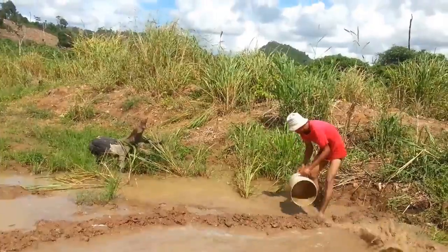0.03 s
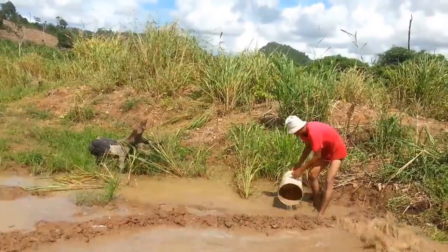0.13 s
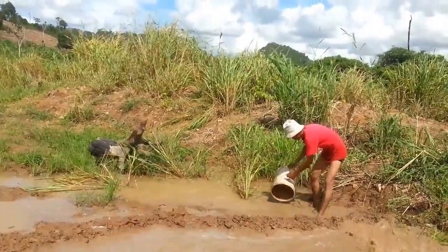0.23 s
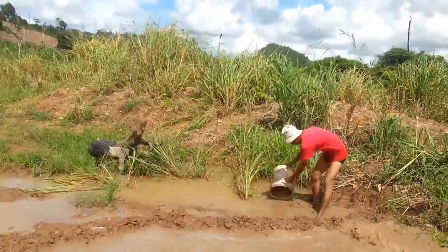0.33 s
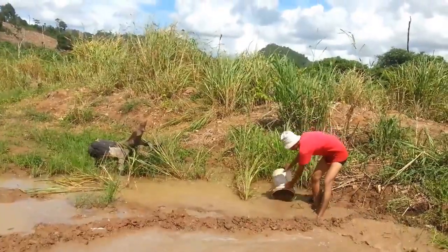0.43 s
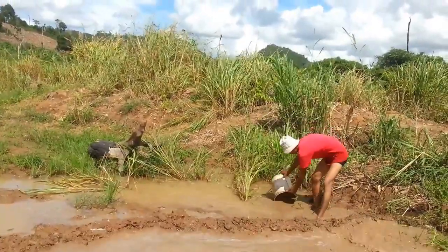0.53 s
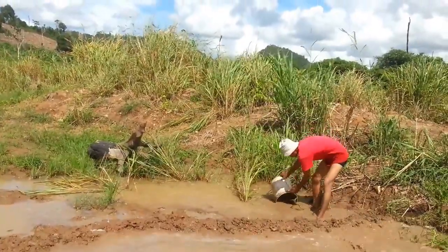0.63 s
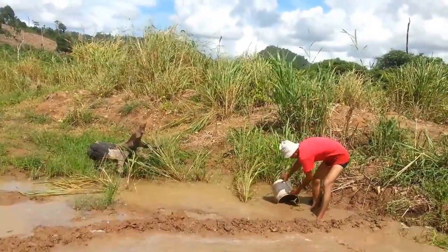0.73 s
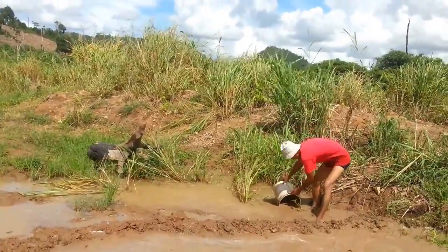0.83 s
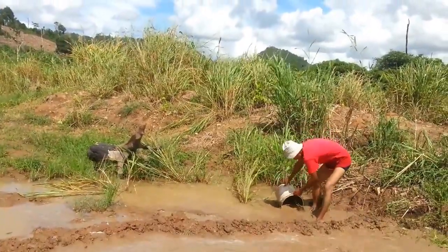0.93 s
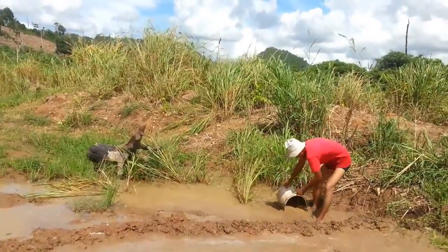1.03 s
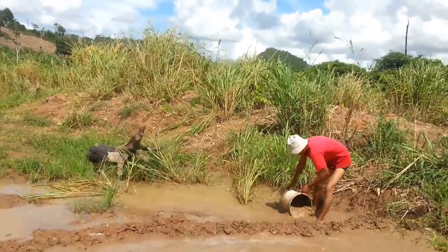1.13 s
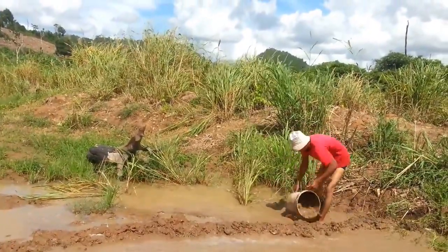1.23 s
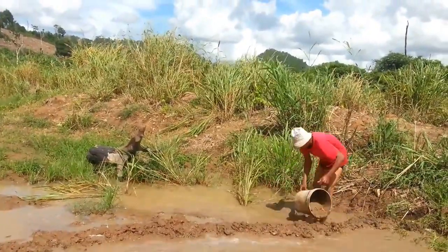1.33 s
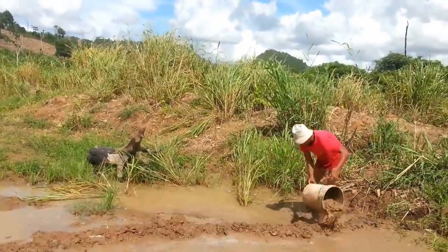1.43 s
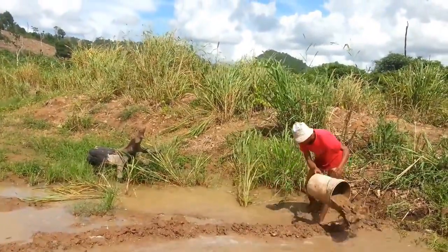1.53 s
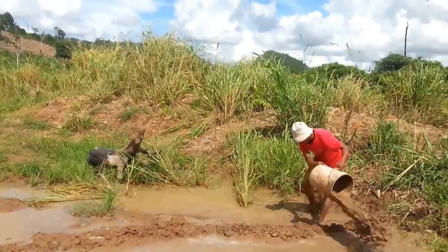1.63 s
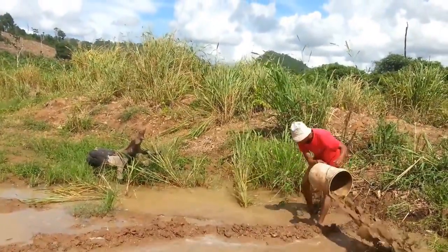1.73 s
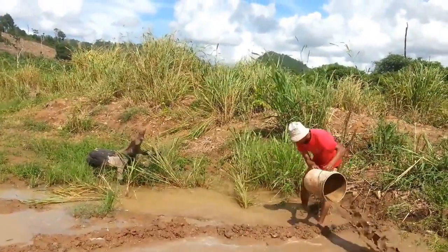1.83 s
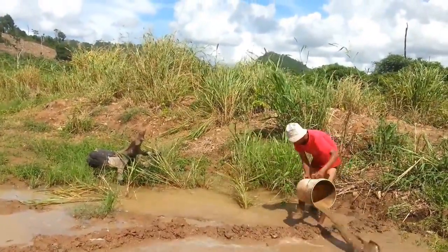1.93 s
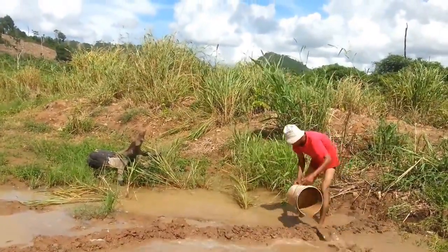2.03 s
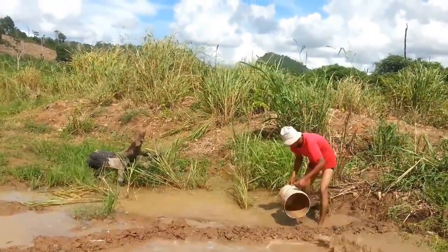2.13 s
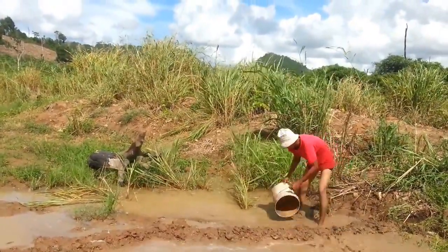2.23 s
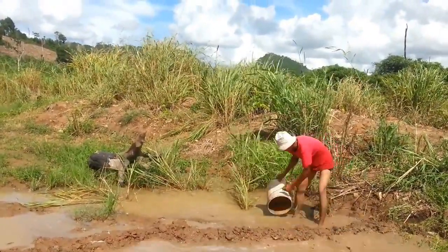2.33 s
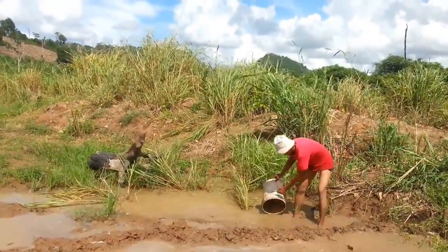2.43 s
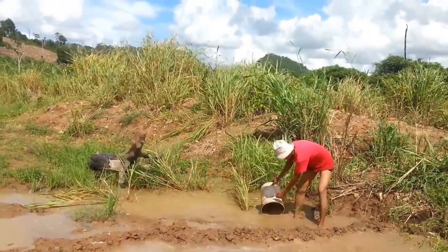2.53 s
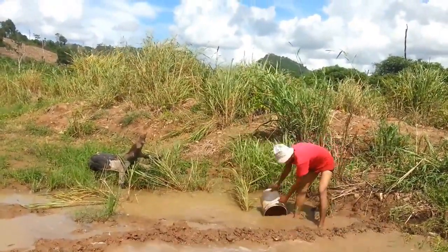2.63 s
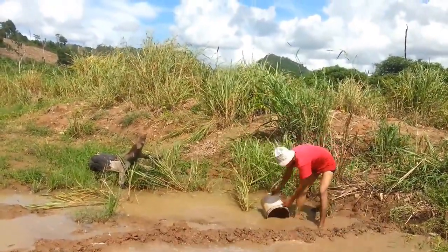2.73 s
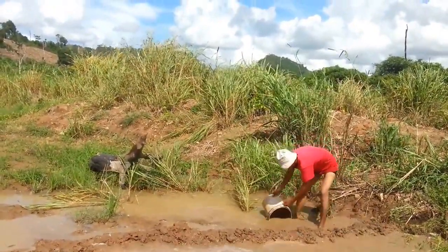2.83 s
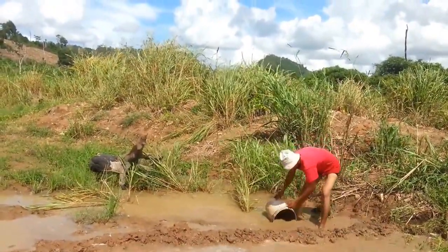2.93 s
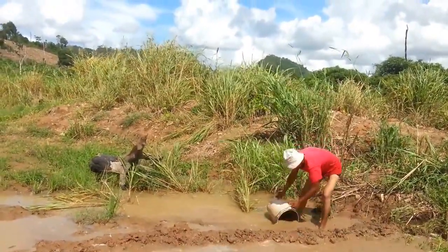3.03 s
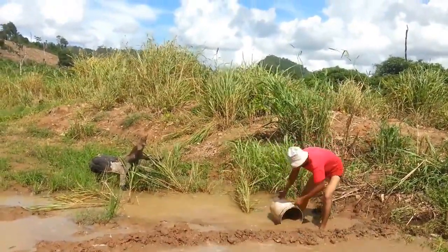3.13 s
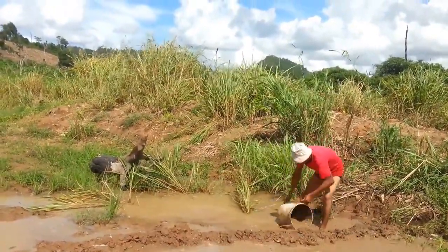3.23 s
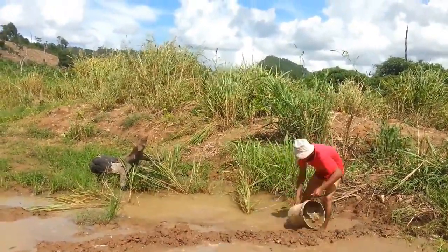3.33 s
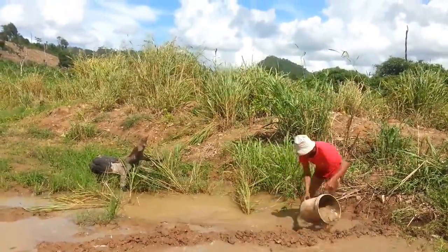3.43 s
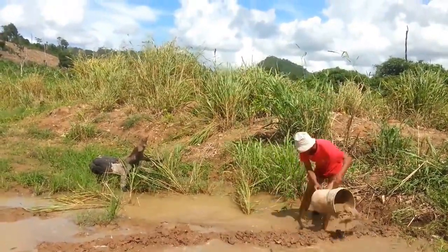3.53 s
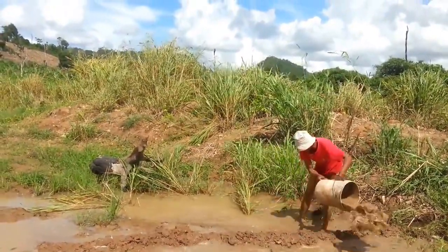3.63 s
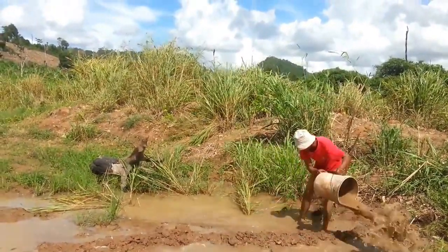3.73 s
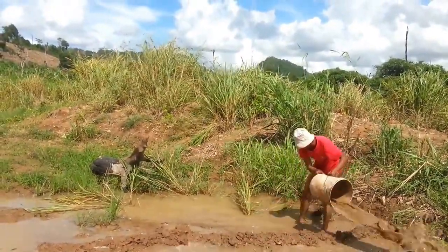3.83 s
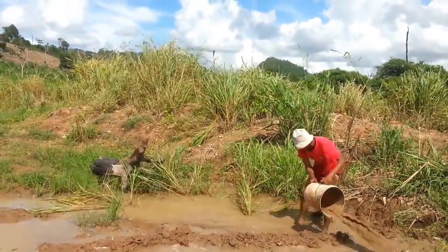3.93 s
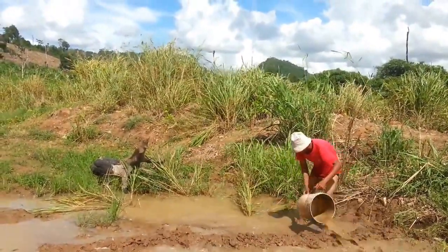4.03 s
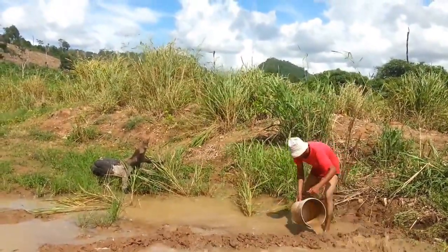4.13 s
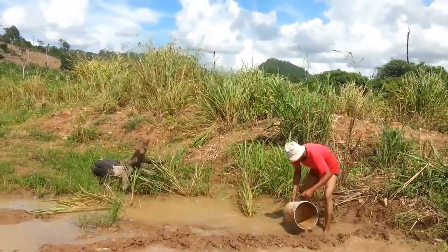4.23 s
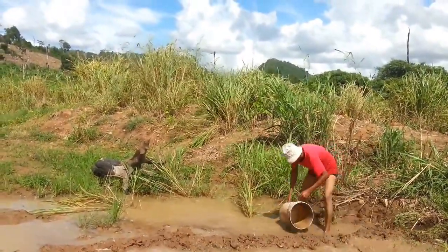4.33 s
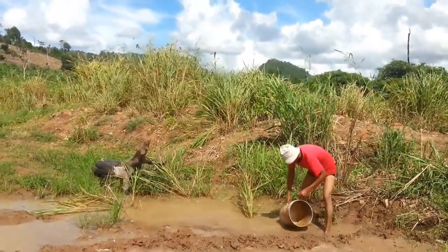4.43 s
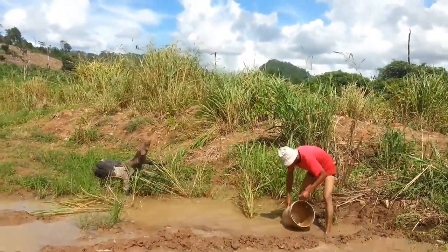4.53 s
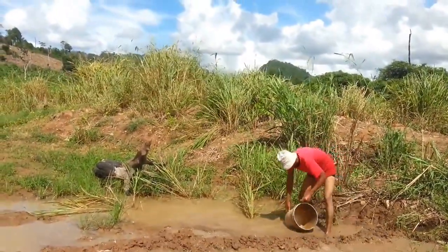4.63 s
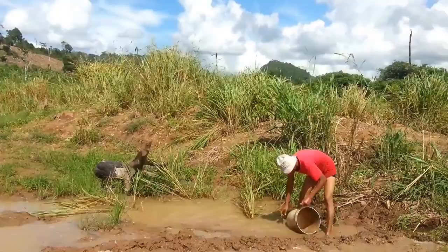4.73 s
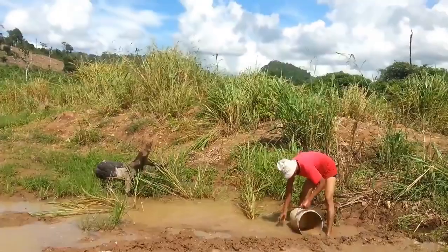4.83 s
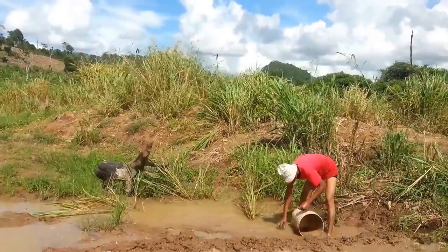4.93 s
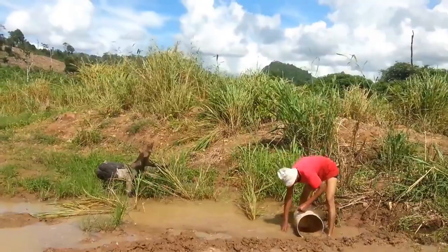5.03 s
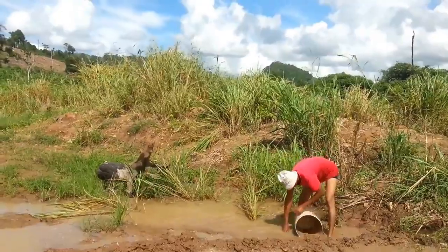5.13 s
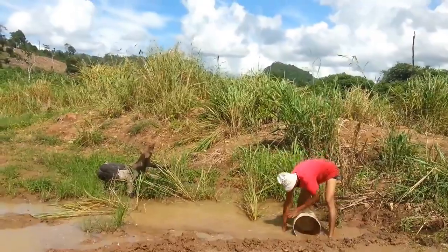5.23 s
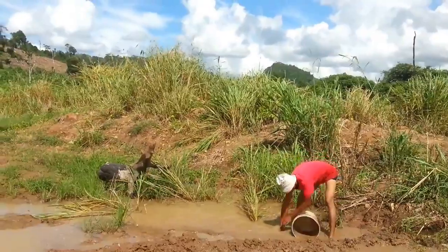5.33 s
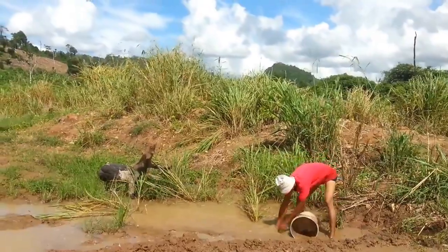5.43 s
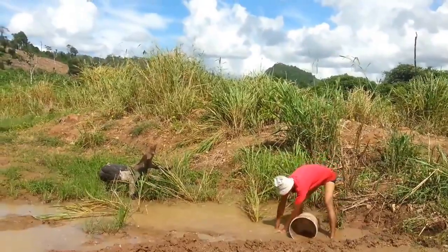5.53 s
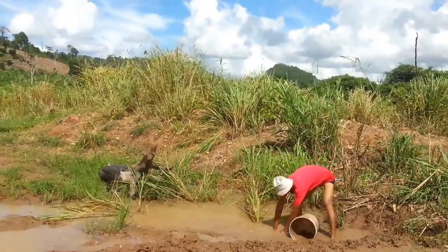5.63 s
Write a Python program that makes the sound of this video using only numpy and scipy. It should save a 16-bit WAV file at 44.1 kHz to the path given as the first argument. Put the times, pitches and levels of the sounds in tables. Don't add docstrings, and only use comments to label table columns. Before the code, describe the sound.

A muddy ditch is bailed by bucket in an open field, heard in stereo with a dry, mid-heavy sound. At 0.1 s a load of water slaps down hard, bubbles bursting and spray ticking, and runs off by about 0.5 s. From 0.6 to 1.8 s the bucket dips and lifts with soft sloshes, low glugs, fine spritzes and drips, while a small bird gives seven thin falling chirps around 0.75-1.1 s, slightly right. The second load lands at 1.9-2.3 s, a broad splash with lumpy plops. Quieter scooping follows, with a wet slap at 2.9 s and a gurgling lift at 3.3-3.7 s. The third load hits at 4.05-4.3 s, the deepest, with a loud hollow gulp near 4.16 s. Then sparse drips and trickling continue, with a faint, very high insect rasp on the left at 5.1-5.3 s. A barely audible low rumble and far engine drone lie underneath.

```python
import sys
import numpy as np
from scipy import signal
from scipy.fft import rfft, irfft, next_fast_len
from scipy.io import wavfile
from scipy.ndimage import uniform_filter1d, map_coordinates

SR = 44100
rng = np.random.default_rng(int(sys.argv[2]) if len(sys.argv) > 2 else 0)


def boost_factor(decibels):
    exponent = np.asarray(decibels, float) / 20
    return 10 ** exponent


def generate_wav(sig):
    pcm = np.round(np.clip(np.atleast_2d(sig).T, -1, 1) * 32767).astype(np.int16)
    wavfile.write(sys.argv[1], SR, pcm)


N = 250488


def water():
    slosh_db, spray_db, mist_db, heave_db = motion()
    deep_db = slosh_db + 0.2294 * (slosh_db + 25.5)
    surge = wobble(30)
    slosh = froth(790.0, 2175, 2.88, cycles=1.31, scatter_db=1.24, wash_db=9.5, count=5000, size=260)
    deep = froth(419.3, 800.5, 2.1, cycles=1.77, scatter_db=0.57, wash_db=10.5, count=1800, size=600)
    spray = froth(2130.6, 7302, 4.24, cycles=2.46, scatter_db=3.5, wash_db=7.5, count=9000, size=140)
    mist = froth(6480, 13540, 4.09, cycles=0.9, scatter_db=3.5, wash_db=5.5, count=12000, size=44)
    heave = froth(139.5, 304.2, 2.87, cycles=0.418, scatter_db=1.5, wash_db=17, count=500, size=500)
    return (boost_factor(slosh_db - 2.43 + 0.655 * surge + 0.55 * wobble(42)) * slosh
            + boost_factor(deep_db - 5.0 + 0.4 * surge + 0.263 * wobble(24.94)) * deep
            + boost_factor(spray_db + 1.4035 + 0.5 * surge + 1.52 * wobble(70)) * spray
            + boost_factor(mist_db + 2.5 + 0.94 * surge + 0.35 * wobble(60)) * mist
            + boost_factor(heave_db - 3.0 + 0.97 * surge + 1.44 * wobble(13.0)) * heave)


# (peak time [s], level [dB], rise [s per 20 dB], fall [s per 20 dB], spray share [dB])
THROWS = [(0.0, -28, .1, .5, -7.5), (0.113, -21, 0.074, 0.1846, -4.5), (0.2, -27.5, 0.073, 0.192, -24),
          (0.35, -31, 0.245, 0.2824, -11.5), (0.46, -40, 1, 1.07, -2.5), (1.86, -46.5, 0.068, 0.19, 8.5),
          (1.94, -20.5, 0.049, 0.297, -4), (2.01, -19.5, 0.089, 0.1911, -9.5),
          (2.188, -25.5, 0.183, 0.3333, -5.5), (2.36, -37.5, 0.42, 0.2666, -6.5),
          (2.5, -40.5, 0.51, 0.93, -3.5), (4.026, -42, 0.076, 0.7716, 5.5),
          (4.061, -22.5, 0.0402, 0.36, -2.5), (4.156, -21, 0.1205, 0.1758, -8),
          (4.23, -29, 0.033, 0.2581, -9.5), (4.37, -31, 0.32, 0.1328, -10.5), (4.47, -39, 0.29, 0.19, -1.5)]
# (peak time [s], level [dB], rise [s per 20 dB], fall [s per 20 dB], spray share [dB])
STIRS = [(0.62, -40, 0.128, 0.3652, -6.5), (0.81, -47, 0.37, 4, -6.5), (1.2, -44, 0.4, 0.17, -12),
         (1.27, -50.5, 0.076, 0.41, 7), (1.44, -38.5, 0.287, 0.25, -8), (1.51, -39.5, 0.252, 0.1737, 0.5),
         (1.63, -43.5, 0.16, 0.39, -8.5), (1.79, -45, 0.26, -4.72, -7.5), (2.7, -37.5, 0.326, 0.16, -10),
         (2.94, -38.5, 0.121, 0.1239, -5.5), (3.12, -52.5, 0.5, 2.1, -6.5), (3.36, -46, 0.103, 0.5, 4.5),
         (3.47, -36.5, 0.194, 0.2163, -6), (3.622, -30.5, 0.1164, 0.1232, -4.5),
         (3.8, -43.5, 0.196, 0.14, -5.5), (4.7, -46, 0.3, 3.5, -4), (5.5, -46, 1, -0.5, -11),
         (5.68, -53, 0.27, 1.5, -2)]
# (peak time [s], level [dB], rise [s per 20 dB], fall [s per 20 dB])
HEAVES = [(0.11, -37, 0.13, 0.163), (0.351, -38.5, 0.098, 0.0575), (0.618, -51, 0.127, 0.67),
          (1.09, -53.5, 0.72, 7), (3.2, -58, 0.66, 2), (1.255, -41, 0.039, 0.2), (1.51, -44.5, 0.15, 0.21),
          (1.63, -45.5, 0.056, 0.12), (1.79, -53.5, 0.103, -1), (2.02, -33.5, 0.093, 0.0452),
          (2.22, -46, 0.42, 0.01), (2.72, -47.5, 0.055, 0.25), (2.88, -40, 0.077, -0.02),
          (3.619, -41, 0.104, 0.0925), (4.061, -42.5, 0.016, 0.58), (4.16, -18.5, 0.019, -0.0187),
          (4.27, -48.5, .1, 0.18), (4.9, -57.5, 1, 2)]
# (slosh [dB], spray [dB], mist [dB], heave [dB])
CALM_DB = (-53.5, -58.5, -55, -69.5)
# (thrown [dB], stirred [dB])
MIST_DB = (-6, -11)


def motion():
    mist_grows = 0.043
    t = np.arange(0, N / SR + 0.01, 0.002)
    power = np.zeros((4, len(t))) + boost_factor(CALM_DB)[:, None] ** 2
    for table, under_db in zip((THROWS, STIRS), MIST_DB):
        s, db, rise, fall, share_db = np.transpose(table)
        spray_db = db + share_db
        mist_db = spray_db + under_db + mist_grows * (db + 41.5)
        power[0] += surges(t, s, db, rise, fall)
        power[1] += surges(t, s, spray_db, rise, fall)
        power[2] += surges(t, s, mist_db, rise, 0.69 * fall)
    power[3] += surges(t, *np.transpose(HEAVES))
    return [np.interp(np.arange(N) / SR, t, 10 * np.log10(p)) for p in power]


def surges(t, s, db, rise, fall):
    late = t - s[:, None]
    away = np.abs(late / np.where(late < 0, rise[:, None], fall[:, None]))
    return (boost_factor(db[:, None] - 20 * away ** 1.082) ** 2).sum(axis=0)


# (frequency [Hz], coherence [0-1])
ALIKE = [(60, 1), (150, 0.33), (600, 0.98), (1800, 0.61), (4800, 0.77), (5400, 0), (15000, 0)]


def froth(lo_hz, hi_hz, edge, cycles, scatter_db, wash_db, count, size):
    swarms = []
    for _ in range(2):
        when, pitch, big = rng.random((3, count))
        hz = lo_hz * (hi_hz / lo_hz) ** pitch
        strength = hz * boost_factor(-scatter_db * np.log(big + 0.02))
        swarm = rings(when * N / SR, strength, hz, cycles / hz, 0.03245, 1.0, size)
        swarms.append(unit(swarm) + boost_factor(wash_db) * wash(patchy_db=1.1))

    def heard(f):
        band = 1 / (1 + (lo_hz / (f + 1)) ** edge) / (1 + (f / hi_hz) ** edge)
        turn = np.arccos(np.clip(along(ALIKE, f), 0, 1)) / 2
        shared, opposed = np.cos(turn), np.sin(turn)
        return band * ports(f)[:, None] * np.array([[shared, opposed], [shared, -opposed]])
    return unit(filtered(np.array(swarms), heard).sum(axis=1))


def wash(patchy_db):
    z = signal.stft(rng.standard_normal(N), nperseg=512)[2]
    patches = uniform_filter1d(rng.standard_normal(z.shape), size=5, axis=0)
    patches = uniform_filter1d(patches, size=6, axis=1)
    return signal.istft(z * boost_factor(patchy_db * patches / patches.std()), nperseg=512)[1][:N]


# (time [s],
# peak level [dB], pitch [Hz], swell [ms])
POCKETS = [(0.106, -3, 1270, 1.16), (0.115, -6, 1168, 2.65), (0.141, -15.5, 1255, 3.4),
           (0.212, -9.5, 857, 5.1), (1.256, -32.5, 1314, 6.7), (1.438, -16, 1554, 2.96),
           (1.514, -17.5, 1044, 2.26), (1.696, -31, 928, 8), (1.929, -8, 1832, 3.76),
           (1.963, -3, 1672, 2.6), (2.019, -17.5, 1322, 3.8), (2.043, -11.5, 1104, 11.4),
           (2.107, -11.5, 617.6, 7.2), (2.144, -14, 1048, 13.6), (2.179, -10, 639, 2.7),
           (2.204, -17.5, 631, 4.2), (2.94, -16, 1082, 4), (3.394, -26, 697, 8.2), (3.408, -17, 1163, 2.7),
           (4.056, -15, 1182, 9.4), (4.069, -11.5, 1673, 4.8), (4.084, 2, 813, 0.78),
           (4.111, -2.5, 615, 3.6), (4.134, -0.5, 710, 2.2), (4.147, 0, 573.3, 3.85), (4.171, -1, 625, 2.3),
           (4.204, -10.5, 558, 5.4), (4.244, -16, 1637, 7.9), (5.491, -30.5, 1121, 11.6),
           (4.158, -3.5, 343.4, 5.37),
    (4.1575, 9.5, 572.9, 4.77),
    (4.6, -36, 650, 4.8),
    (3.309, -34, 555, 5.8),
]


def crushed_air():
    return plops(np.array(POCKETS), -9.5, 0.00188, 3.08)


# (time [s], peak level [dB], pitch [Hz])
BUBBLES = [(0.087, -7, 1141), (0.29, -21, 678), (0.44, -24.5, 1124), (1.868, -22, 1257),
           (1.901, -13.5, 1746), (1.94, -7.5, 1724), (1.93, -26.5, 1905), (1.948, -1.5, 641),
           (2.525, -23, 1602), (2.605, -32.5, 1610), (2.632, -24, 1286), (2.913, -9.5, 1199),
           (4.021, -27, 1890), (4.024, -29.5, 1690), (4.049, -11, 1366), (4.126, -2, 809),
           (4.794, -33.5, 830), (5.441, -26, 1035)]
# (time [s], peak level [dB], pitch [Hz])
GURGLES = [(0.707, -25.5, 587), (0.74, -26.5, 1228), (0.79, -25, 985), (0.886, -29.5, 699),
           (1.129, -26, 535), (1.254, -22.5, 1237), (1.492, -26.5, 1738), (1.494, -32, 1102),
           (1.736, -31, 1950), (1.778, -26, 1292), (3.178, -33.5, 1147), (3.248, -29.5, 1527),
           (3.273, -34.5, 1046), (3.332, -25, 1652), (3.379, -15.5, 1776), (3.559, -29, 1792),
           (3.613, -26, 1612), (3.677, -21.5, 1802), (3.71, -27, 555.3), (3.824, -33.5, 1030),
           (4.632, -32, 1215), (4.932, -32.5, 823), (4.981, -33.5, 1193), (5.109, -28, 1139),
           (5.213, -32, 608), (5.406, -29, 1778), (5.613, -40, 1230)]


def large_bubbles():
    table = np.vstack([swelling(BUBBLES, 1.574), swelling(GURGLES, 2.7)])
    return plops(table, -5.0, 0.00507, 0.837)


# (time [s], peak level [dB], t60 [s])
SLAPS = [(0.088, -10.5, 0.04), (0.105, -2.5, 0.085), (0.223, -19.5, 0.077), (0.441, -45, 0.068),
         (0.707, -48, 0.1), (0.791, -22, 0.167), (1.255, -34, 0.0568), (1.484, -23, 0.077),
         (1.901, -18, 0.05), (1.939, -11.5, 0.133), (2.133, -13.5, 0.123), (2.1455, -2, 0.087),
         (2.865, -27, 0.295), (2.913, -7.5, 0.036), (2.922, -14.5, 0.077), (3.333, -17.5, 0.0336),
         (3.38, -20.5, 0.2), (4.126, -3, 0.086), (4.93, -23.5, 0.168), (5.441, -24.5, 0.084)]


def slaps():
    def dull(hz):
        return 1 / (1 + 1j * hz / 2600) ** 2 / (1 + 260 / (1j * hz + 1)) ** 2
    return bursts(SLAPS, 8.43, dull)


# (time [s], peak level [dB])
SPRITZ = [(0.2251, -13.5), (0.7096, -19.5), (0.806, -24.5), (1.253, -21), (1.3342, -21.5), (1.3795, -22.5),
          (1.4535, -23.5), (1.486, -21.5), (1.83, -30), (2.941, -26), (3.368, -20.5), (3.711, -30),
          (3.969, -26), (4.586, -24)]


def spritz():
    def bright(hz):
        return 1 / (1 + 2300 / (1j * hz + 1)) ** 3 / (1 + 1j * hz / 8000) ** 2
    t60_s = 0.0656
    return bursts([(s, db, t60_s) for s, db in SPRITZ], 14.87, bright)


def bursts(table, gain_db, colour):
    out, t = np.zeros(N + SR), np.arange(SR // 8) / SR
    for s, db, t60 in table:
        burst = boost_factor(db + gain_db - 60 * t / t60) * rng.standard_normal(len(t))
        out[round(s * SR):][:len(t)] += burst
    return filtered(out[:N], colour)


# (time [s], peak level [dB], pitch [Hz])
DROPS = [(0.1067, -24, 4330), (0.442, -22.5, 2595), (0.672, -35.5, 2690), (0.7406, -30.5, 2627),
         (0.9545, -28, 5870), (1.063, -37, 2720), (1.8334, -33.5, 3850), (1.901, -22.5, 3780),
         (1.933, -14, 4900), (2.144, -15, 4870), (2.9406, -25.5, 6400), (2.9471, -38, 3930),
         (3.0038, -28, 5450), (3.1038, -33.5, 7220), (3.288, -31, 3806), (3.4026, -24.5, 5380),
         (3.5628, -28, 4480), (4.026, -25.5, 5330), (4.0444, -18.5, 4900), (4.0599, -6.5, 5220),
         (4.275, -17, 4440), (4.889, -31.5, 4340), (5.05, -33.5, 3000)]


def drops():
    s, db, hz = np.transpose(DROPS)
    swell_ms = 0.28 * (5000 / hz) ** 2.3
    return plops(np.transpose([s, db - 5 * swell_ms, hz, swell_ms]), 0.9, 0.006, 0.6)


# (time [s], peak level [dB], pitch [Hz])
LUMPS = [(0.028, -29.5, 1130), (0.032, -22, 559), (0.046, -20.5, 614), (0.075, -12.5, 1130),
         (0.091, -14, 557), (0.148, -24.5, 1640), (0.15, -25.5, 734), (0.16, -18, 1060), (0.172, -24, 570),
         (0.214, -20.5, 1654), (0.23, -23, 565), (0.242, -26.5, 586), (0.261, -30, 600), (0.34, -28, 1057),
         (0.375, -27.5, 1224), (0.389, -34.5, 647), (0.444, -27, 1810), (1.905, -24, 900),
         (1.911, -21, 1715), (1.954, -18.5, 1170), (1.987, -12.5, 1170), (2.001, -16.5, 1550),
         (2.033, -22, 1130), (2.053, -20, 1844), (2.07, -20, 1096), (2.134, -16.5, 1666),
         (2.168, -24, 1180), (2.169, -14.5, 1894), (2.2, -16.5, 1222), (2.207, -20, 1643),
         (2.222, -21, 1577), (2.229, -25.5, 1120), (2.258, -25, 815), (2.3, -25, 1590), (2.314, -22, 1166),
         (2.34, -23, 1433), (2.373, -24, 1668), (2.385, -27.5, 1934), (4.055, -14.5, 1285),
         (4.094, -20, 762), (4.117, -10, 1850), (4.125, -23.5, 1286), (4.154, -9.5, 1078),
         (4.158, -13.5, 1687), (4.175, -21.5, 1130), (4.176, -20.5, 1883), (4.241, -21, 1540),
         (4.248, -27, 665), (4.251, -24, 1110), (4.277, -22.5, 1810), (4.293, -19.5, 1494),
         (4.338, -27.5, 1096), (4.387, -24, 1340), (4.402, -23, 1703), (4.415, -33, 666),
         (4.445, -26.5, 1298), (4.456, -26, 1307)]


def mud_lumps():
    return plops(swelling(LUMPS, 1.976), -2.29, 0.00335, 1.47)


# (time [s], peak level [dB], pitch [Hz])
FLECKS = [(0.077, -23, 5330), (0.09, -29, 3650), (0.117, -15, 4343), (0.226, -22.5, 2700),
          (0.441, -34.5, 7150), (0.692, -33.5, 4900), (0.711, -23.5, 4786), (0.807, -31, 3726),
          (1.255, -31, 4580), (1.264, -32.5, 3420), (1.337, -29, 3900), (1.395, -32, 4600),
          (1.456, -31.5, 4220), (1.485, -27.5, 2920), (1.489, -27, 3970), (1.507, -42, 7170),
          (1.845, -36.5, 7000), (1.853, -32.5, 6420), (1.913, -25, 3950), (1.941, -22, 5100),
          (1.985, -18, 5040), (2.225, -24.5, 4000), (2.413, -34.5, 2930), (2.578, -35, 5470),
          (2.923, -29.5, 2863), (3.104, -43, 7390), (3.659, -28, 4840), (4.048, -21, 5100),
          (4.078, -18, 2850), (4.104, -15.5, 5160), (4.121, -16, 5050), (4.266, -30, 3470),
          (4.35, -27, 5090), (4.588, -31, 6780), (5.586, -38.5, 5170)]


def flecks():
    return plops(swelling(FLECKS, 1), 0.97, 0.0061, 0.715)


# (time [s], peak level [dB], pitch [Hz])
DRIPS = [(0.476, -29.5, 1148), (0.499, -29.5, 1206), (0.584, -30, 1056), (0.63, -34, 1493),
         (0.632, -33, 645), (0.679, -42, 1593), (0.804, -27.5, 1826), (0.832, -32.5, 1082),
         (0.966, -36, 1445), (1.429, -34, 655), (1.442, -36.5, 733), (1.494, -29.5, 1105),
         (1.533, -34, 1828), (1.62, -34, 1674), (1.79, -33, 1620), (1.811, -35.5, 571), (2.562, -30, 1304),
         (2.607, -39.5, 790), (2.607, -32, 1970), (2.714, -29.5, 1720), (2.729, -30, 1240),
         (2.785, -35.5, 700), (2.848, -37, 1430), (2.873, -33, 581), (2.887, -28.5, 769),
         (2.916, -27.5, 581), (3.023, -38, 1210), (3.036, -37, 1105), (3.088, -40.5, 1690),
         (3.164, -39, 1494), (3.178, -40.5, 708), (3.311, -43, 690), (3.315, -45, 1650), (3.391, -30, 671),
         (3.402, -34, 1092), (3.459, -36, 650), (3.509, -39.5, 1840), (3.593, -32.5, 1806),
         (3.637, -28.5, 740), (3.642, -24, 1780), (3.648, -23, 1313), (3.781, -38, 751),
         (3.863, -39.5, 917), (4.673, -36, 1077), (4.767, -38.5, 1670), (4.826, -40.5, 1117),
         (4.826, -36, 1560), (4.843, -37, 1580), (4.936, -32, 1112), (5.057, -43.5, 1150),
         (5.141, -42, 1837), (5.27, -40.5, 657), (5.28, -38.5, 1754), (5.293, -40.5, 1305),
         (5.408, -39, 522), (5.486, -35.5, 745), (5.665, -37, 1510)]


def drips():
    return plops(swelling(DRIPS, 2.4), -1.1, 0.0063, 1.04)


# (time [s], peak level [dB], pitch [Hz])
GLUGS = [(0.605, -35.5, 246), (0.785, -39.5, 293), (1.191, -41.5, 199), (1.247, -33, 251),
         (1.262, -37.5, 179), (1.342, -46.5, 261), (1.477, -45.5, 349), (1.507, -33.5, 300),
         (1.626, -35, 224), (1.693, -36.5, 257), (1.764, -42, 254), (2.09, -28, 322), (2.92, -38.5, 200)]


def glugs():
    return plops(swelling(GLUGS, 2.46), -1.6, 0.0096, 1.16)


def swelling(table, swell_ms):
    s, db, hz = np.transpose(table)
    return np.transpose([s, db, hz, swell_ms * (1000 / hz) ** 0.202])


def plops(table, gain_db, rise, soft):
    s, db, hz, swell_ms = np.transpose(table)
    size = boost_factor(db + gain_db) / (np.abs(ports(hz).mean(axis=0)) + 0.003)
    return rings(s, size, hz, swell_ms / 1000, rise, soft, 1500)


def rings(s, size, hz, swell, rise, soft, size_n):
    t = np.arange(size_n) / SR
    u = t / swell[:, None]
    envelope = (u * np.exp(1 - u)) ** soft
    wave = envelope * np.sin(2 * np.pi * hz[:, None] * t * (1 + rise * u))
    at = np.round(s * SR).astype(int)[:, None] + np.arange(size_n)
    return np.bincount(at.ravel(), (size[:, None] * wave).ravel(), N + size_n)[:N]


def blurred(x, wet_db, t60):
    t = np.arange(1600) / SR
    tail = rng.standard_normal(len(t)) * boost_factor(-60 * t / t60)
    return x + boost_factor(wet_db) * signal.fftconvolve(x, tail / np.linalg.norm(tail))[:N]


# (frequency [Hz], level [dB])
LEFT = [(100, -34.5), (300, -16.5), (440, -12), (600, -8), (950, -5.5), (1150, -1), (1400, -6), (1700, -1),
        (2700, -13.5), (4000, -11), (5900, -25.5), (7200, -22), (10500, -28.5), (14000, -21)]
# (frequency [Hz], level [dB])
RIGHT = [(100, -25), (300, -13.5), (440, -12), (600, -8), (950, -7), (1150, -4), (1450, -8.5), (1750, -5.5),
         (2100, -7), (4300, -11.5), (5000, -7), (7000, -19), (9500, -25.5), (12000, -28), (14500, -34.5)]
# (frequency [Hz], phase [rad])
LEAD = [(1400, 0.4), (1900, 1.073), (2240, 3.862), (3600, 4.02), (4800, 4.73), (8000, 4.67), (15000, 13)]


def ports(hz):
    half = np.exp(0.5j * along(LEAD, hz))
    bounce = [1 + 0.0031 * np.exp(-2j * np.pi * hz * lag) for lag in (0.0041, 0.0044)]
    return np.array([boost_factor(along(LEFT, hz)) / half, boost_factor(along(RIGHT, hz)) * half]) * bounce


def prompt(hz):
    response = ports(hz)
    fold = irfft(np.log(np.abs(response).prod(axis=0)) / 2)
    fold[len(fold) // 2:] = 0
    return response * np.exp(2j * rfft(fold).imag)


# (time [s], level [dB], start pitch [Hz], end pitch [Hz], length [s])
BIRD = [
    (.75, -53, 6600, 6450, .014),
    (.822, -51, 6650, 6400, .016),
    (.858, -51, 6750, 6450, .022),
    (.902, -51, 6800, 6400, .024),
    (.94, -50, 7150, 6400, .037),
    (.997, -48, 7200, 6350, .037),
    (1.057, -49, 7150, 6400, .035),
]


def bird():
    out = np.zeros(N)
    for s, db, from_hz, to_hz, length in BIRD:
        u = np.linspace(0, 1, round(length * SR))
        hz = from_hz + (to_hz - from_hz) * u ** 1.4
        whistle = np.sin(2 * np.pi * np.cumsum(hz) / SR)
        out[round(s * SR):][:len(u)] += boost_factor(db) * np.sin(np.pi * u) ** 0.5 * whistle
    out = out * boost_factor(3 * wobble(160))
    return out * boost_factor([[-2.5], [2.5]])


# (frequency [Hz], width [Hz], level [dB])
INSECT = (12100, 420, -61)
# (start time [s], end time [s])
INSECT_SPAN = (5.068, 5.345)


def insect():
    hz, width, db = INSECT
    start, end = INSECT_SPAN
    t = np.arange(N) / SR
    rasp = filtered(rng.standard_normal(N), lambda f: np.exp(-((f - hz) / width) ** 2))
    gate = np.clip(np.minimum(t - start, end - t) / 0.00664, 0, 1)
    return boost_factor(db + 1.5 * wobble(70)) * gate * unit(rasp) * boost_factor([[4], [-6]])


# (frequency [Hz], spectral level [dB])
FIELD = [(18, -35.5), (30, 2), (59, 5.5), (113, 6.5), (236, -1.5), (306, 10), (450, -66.5), (580, -37),
         (990, -120)]
# (frequency [Hz], width [Hz], level [dB])
DRONE = (238, 34.6, -57.5)


def field(near):
    shared, left, right = filtered(rng.standard_normal((3, N)), lambda f: boost_factor(along(FIELD, f)))
    rumble = unit(np.array([shared + 0.78 * left, shared + 0.61 * right]))
    rumble = boost_factor(-63.5 + 1.36 * wobble(6.4)) * rumble
    hz, width, db = DRONE
    engine = filtered(rng.standard_normal(N), lambda f: np.exp(-((f - hz) / width) ** 2))
    keep = np.exp(-1 / (0.25 * SR))
    held = np.sqrt(signal.lfilter([1 - keep], [1, -keep], np.mean(near ** 2, axis=0)))
    return (rumble + boost_factor(db) * unit(engine)) / (1 + held / boost_factor(-38))


def unit(x):
    return x / np.sqrt(np.mean(np.mean(np.atleast_2d(x), 0) ** 2) + 1e-20)


def along(points, hz):
    f, v = np.transpose(points)
    return np.interp(np.log(hz + 1), np.log(f + 1), v)


def filtered(x, response):
    m = 2 * next_fast_len(N // 2 + 4096)
    return irfft(rfft(x, m) * response(np.fft.rfftfreq(m, 1 / SR)), m)[..., :N]


def wobble(rate):
    return map_coordinates(rng.standard_normal(int(N * rate / SR) + 4), [np.arange(N) * rate / SR])


def scene():
    single = large_bubbles() + crushed_air() + drops() + slaps() + spritz()
    single = single + mud_lumps() + drips() + flecks() + glugs()
    single = single * boost_factor(1.5 * wobble(400))
    near = water() + filtered(blurred(single, wet_db=-10, t60=0.05), prompt)
    return near + bird() + insect() + field(near)


def top_cut(x):
    return signal.sosfilt(signal.butter(12, 14950, fs=SR, output="sos"), x)


def record(dry):
    thump = filtered(dry ** 2, lambda hz: (hz > 15) / (1 + (hz / 250) ** 2))
    x = filtered(dry + 0.089 * thump, lambda hz: 1 / (1 + (hz / 14528) ** 400))
    x = x / (1 + np.abs(x) ** 12) ** (1 / 12)
    return top_cut(x)


dry = scene()
out = record(dry)
generate_wav(out)
```